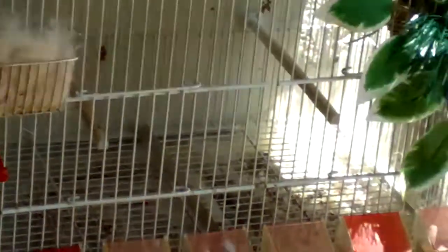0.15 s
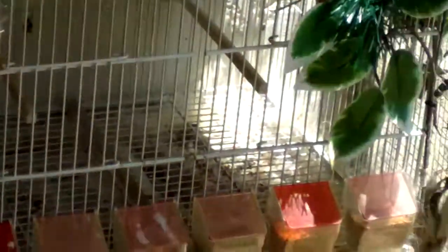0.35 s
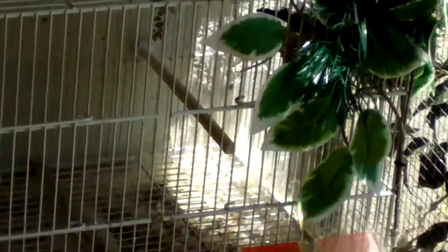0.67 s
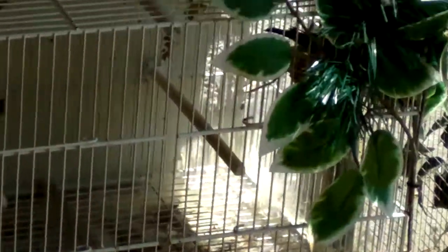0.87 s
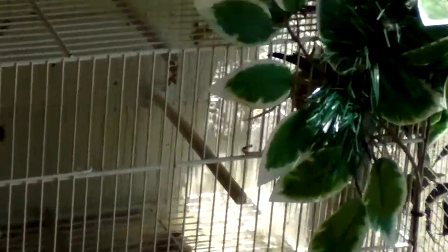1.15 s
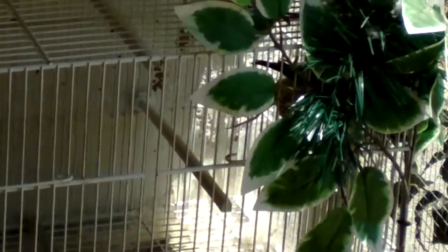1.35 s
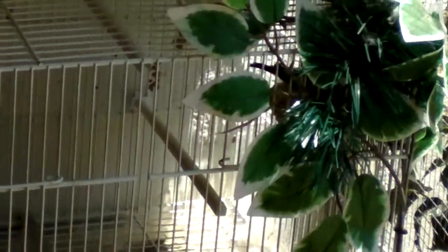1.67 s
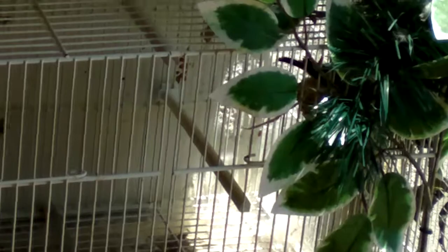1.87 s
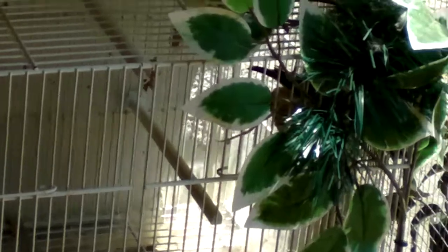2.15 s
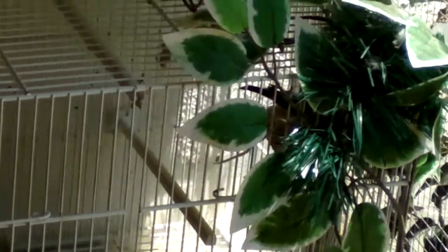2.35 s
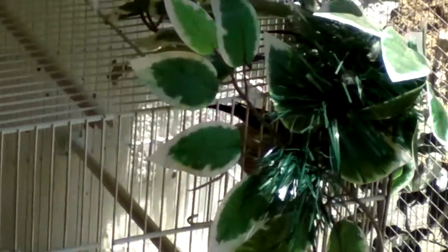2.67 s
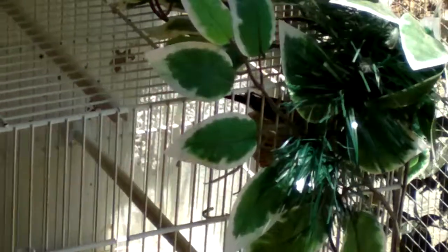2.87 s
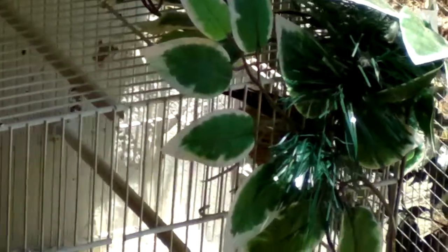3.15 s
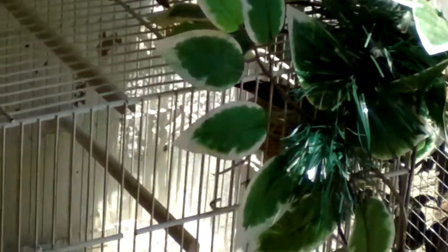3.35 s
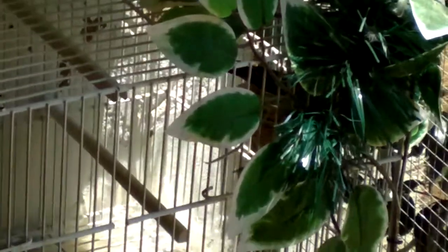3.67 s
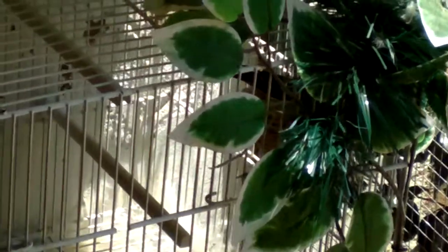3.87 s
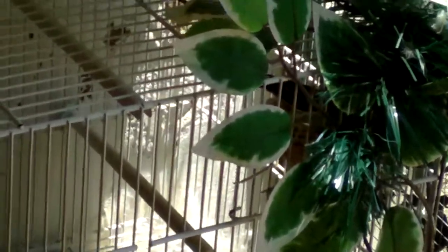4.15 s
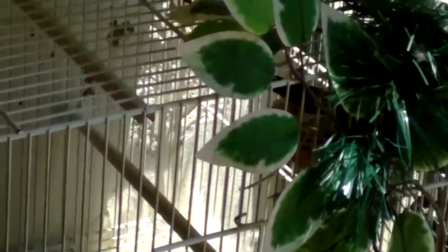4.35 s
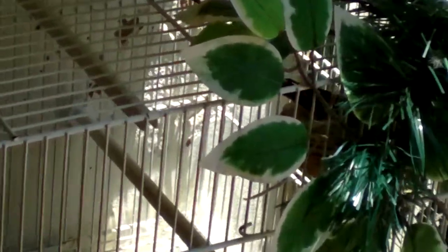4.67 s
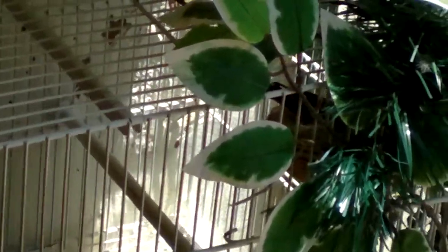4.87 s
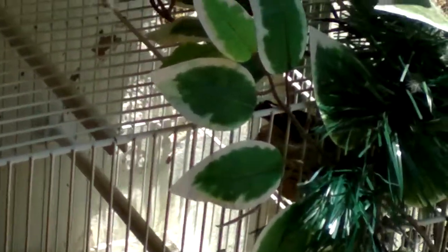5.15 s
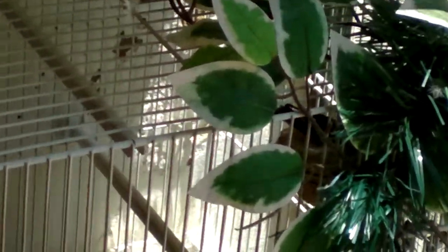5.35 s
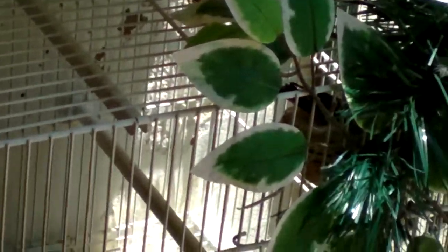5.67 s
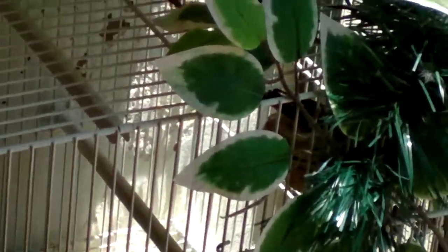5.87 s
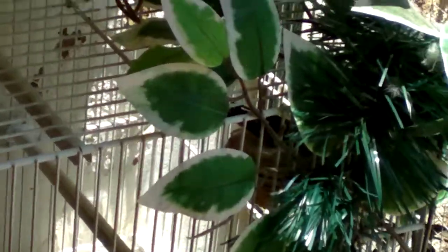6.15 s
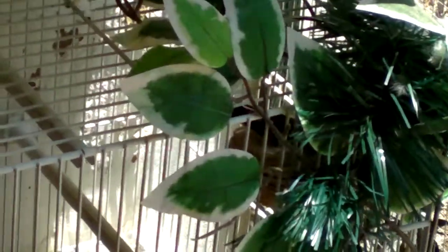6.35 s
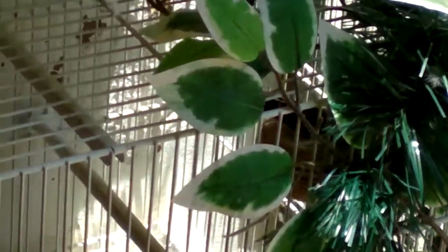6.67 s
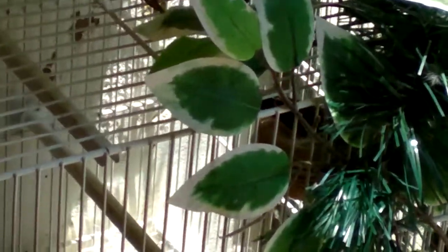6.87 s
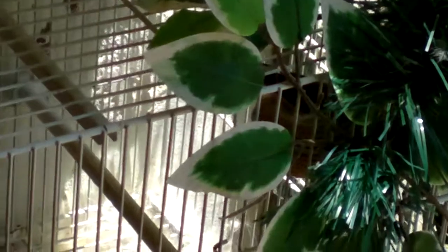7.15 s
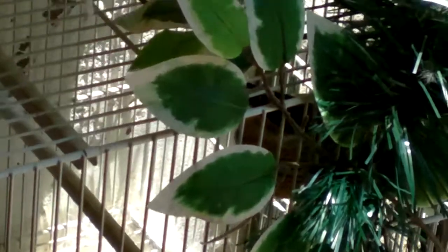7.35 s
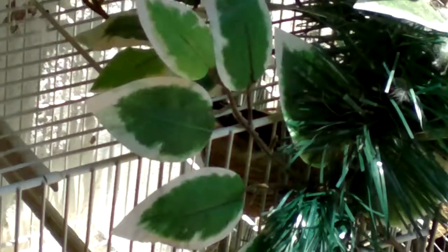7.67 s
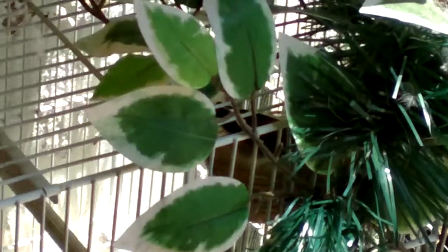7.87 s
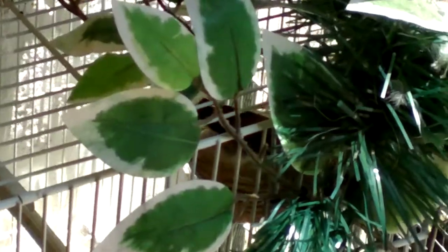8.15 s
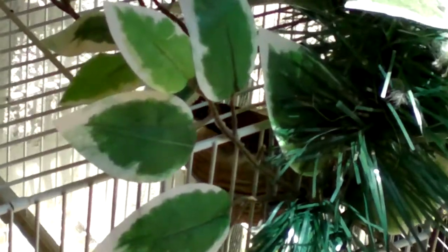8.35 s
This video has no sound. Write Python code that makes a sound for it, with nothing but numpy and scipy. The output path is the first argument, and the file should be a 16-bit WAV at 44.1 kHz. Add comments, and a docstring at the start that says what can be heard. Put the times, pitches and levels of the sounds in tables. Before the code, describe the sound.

In a small, slightly echoing room with a faint steady hush, caged finches exchange high chirps with short pauses. A pair of light knocks comes right by the microphone, and a bird flutters, its feathers grazing the wires. Quick sweeping notes and pips follow in scattered bursts, building to a rising whistle with a buzzy undertone and a loud flurry of chirps. A muffled close knock and two quiet chips finish.

```python
"""Goldfinches in wire cages, heard from one microphone in a small, bright room. Rising contact chips open
from the far perches, and two small knocks sound close to the microphone. Wings flutter and brush the
wires, most around 2 s, while nearer birds chip in. From 4 s the song comes in bursts, often on both
sides of the syrinx at once. Just after 7 s a long whistle rises and swells over a nasal wheeze;
a few loud notes, one more close knock and two soft chips end the scene."""
import sys
import numpy as np
from scipy import signal
from scipy.fft import rfft, irfft, next_fast_len
from scipy.io import wavfile
from scipy.ndimage import map_coordinates

SR = 44100
rng = np.random.default_rng(int(sys.argv[2]) if len(sys.argv) > 2 else 0)


def transcribe(u):
    """Save the signal u as a 16-bit wav file named by the first command-line argument.

    u: samples, shape (n,) or (channels, n), limited to [-1, 1]; the rate is SR.
    q: integer samples, one column per channel.
    """
    v = np.clip(np.atleast_2d(u).T, -1, 1)
    q = np.round(v * 32767).astype(np.int16)
    wavfile.write(sys.argv[1], SR, q)


N = 375732

NEAR_DB, MID_DB, FAR_DB = 4.5, -5, -19.5  # direct sound at the microphone from three perches
# runs of rising contact calls: start_s, chip_count, top_pitch_hz, level_db, perch_db
CHIP_RUNS = [(-.02, 1, 4560, -26, FAR_DB), (.326, 1, 4493, -33, FAR_DB), (0.44, 1, 4820, -28.5, FAR_DB),
             (1.237, 1, 3507, -30, MID_DB), (1.441, 1, 3595, -26.5, MID_DB), (1.487, 1, 4930, -29, FAR_DB),
             (2.177, 4, 4930, -22.5, FAR_DB), (3.106, 1, 3576, -27.5, MID_DB),
             (3.424, 1, 3760, -48, NEAR_DB), (3.634, 3, 4850, -24.5, FAR_DB),
             (4.533, 1, 3825, -45, NEAR_DB), (4.908, 1, 4103, -42.5, NEAR_DB),
             (5.316, 1, 4168, -24.5, MID_DB), (6.142, 1, 4110, -27.5, FAR_DB),
             (6.229, 1, 4086, -24.5, FAR_DB), (7.009, 1, 3760, -35.5, MID_DB),
             (7.373, 1, 3605, -22.5, MID_DB), (7.706, 1, 3963, -18.5, FAR_DB),
             (8.322, 1, 3900, -49, NEAR_DB), (8.464, 1, 3890, -39, MID_DB)]
# notes that fall onto a held pitch: start_s, length_s, held_pitch_hz, level_db
FALLING_NOTES = [(0.094, 0.066, 2886, -41.5), (.477, 0.028, 2760, -36), (0.752, 0.083, 2667, -58.5),
                 (0.887, 0.18, 2668, -53.5), (3.224, 0.041, 2800, -42.5), (5.654, 0.053, 3526, -24),
                 (7.153, 0.043, 2985, -39.5), (7.834, .06, 2854, -23.5)]
# notes with a far steeper fall: start_s, length_s, held_pitch_hz, level_db
WHIP_NOTES = [(7.277, 0.031, 3943, -20), (7.925, 0.024, 4190, -23)]
# notes that climb and level off: start_s, length_s, start_pitch_hz, top_pitch_hz, level_db
CLIMBING_NOTES = [(4.208, 0.044, 3087, 4630, -22), (5.415, .045, 2540, 3352, -30),
                  (5.476, 0.04, 3760, 4430, -19), (7.097, 0.034, 3190, 3624, -32.5),
                  (7.303, 0.034, 2406, 2725, -35.5), (7.468, 0.032, 4200, 5090, -23)]
# steep two-voiced sweeps: start_s, length_s, start_pitch_hz, end_pitch_hz, level_db
SWEEP_NOTES = [(1.326, 0.039, 4184, 5596, -31.5), (2.991, 0.022, 4434, 5610, -27.5),
               (4.109, .034, 3560, 8050, -31), (7.75, 0.024, 3200, 5940, -17.5)]
# high two-voiced pips: start_s, upper_pitch_hz, level_db, lower_voice_relative_db
PIP_NOTES = [(2.845, 6770, -26.5, -2.5), (4.845, 7060, -41, 5.5), (5.591, 5860, -23.5, -20),
             (7.155, 6820, -24, -3.5)]
# course of the long whistle: time_s, pitch_hz
WHISTLE_PITCH = [(7.18, 2122), (7.45, 3300), (7.511, 3353), (7.553, 3724), (7.581, 3734)]
# nasal wheeze under the whistle: start_s, length_s, start_pitch_hz, level_db
WHEEZE_NOTE = (7.346, 0.21, 1508.5, -25.5)
# the throat during the wheeze: time_s, resonance_hz
THROAT_RESONANCE = [(7.402, 8120), (7.412, 4550), (7.52, 4700)]
# soft low notes between the calls: start_s, held_pitch_hz, level_db
HUSKY_NOTES = [(3.481, 1494, -57.5), (4.33, 1976, -64.5), (4.57, 1410, -59), (5.44, 1106, -49),
               (5.664, 1137, -48.5), (5.92, 1950, -60.5)]
# strength of a syrinx overtone by where it falls: frequency_hz, gain_db
OVERTONE_GAINS = [(6500, -36.5), (8800, -35.5), (12300, -23.5), (16000, -34)]
# bouts of wingbeats: first_peak_s, beat_count, level_db, fade_per_beat_db (negative grows)
WING_BOUTS = [(.01, 2, -57.5, -6.5), (0.226, 6, -56, 0.3), (0.954, 2, -61, -6.5), (1.58, 1, -47.5, 0),
              (1.631, 7, -37, 2.13), (2.543, 2, -43, 14), (5.464, 1, -57.5, 0), (5.69, 2, -48, 7),
              (6.302, 2, -57.5, -8.5), (7.33, 2, -53, 1), (7.815, 1, -47.5, 0)]
# wing tips brushing the wires: peak_s, level_db
WIRE_BRUSHES = [(0.945, -54.5), (1.63, -55.5), (1.725, -41.5), (1.87, -45.5), (2.08, -51.5), (5.689, -60),
                (6.285, -46.5), (7.497, -58), (7.9, -53)]
# air pushed by a wing: frequency_hz, level_db
WHOOSH_SPECTRUM = [(150, -23), (500, -18.5), (950, -8.5), (1600, 2), (2100, 2.5), (2900, -16.5),
                   (9000, -41.5)]
# feathers rubbing: frequency_hz, level_db
FEATHER_SPECTRUM = [(400, -23), (1600, -1), (3000, 10), (5000, -4), (7500, 3.5), (12000, -3.5),
                    (15500, -17)]
# knocks by the microphone: start_s, level_db, thump_relative_db, contact_cutoff_hz
CLOSE_KNOCKS = [(0.733, -35, -25, 5970), (0.848, -22.5, -12.5, 3450), (8.139, -25.5, -40, 654)]
# ring of a knock: frequency_hz, level_db, t60_s
KNOCK_RING = [(323, -17, 0.017), (610, -10, 0.016), (1270, -6, 0.013), (2150, 4.5, 0.0059)]
# decay of the room's tail: frequency_hz, t60_s
ROOM_DECAY = [(300, 0.7), (2000, 0.4), (4500, 0.39), (7000, 0.26), (14000, .25)]
# the quiet room: frequency_hz, level_db
ROOM_TONE_SPECTRUM = [(15, -31), (25, 3), (604, -7.5), (857, -10), (1010, -11.5), (1640, -12.5),
                      (3990, -20.5), (9210, -19), (15800, -33)]


def chips(length=.042, gap_s=.108, start=.56, crest=.72, lower_db=-9, far_cutoff_hz=6200):
    """Near and far chips sweep up and bend over at a crest; the syrinx's other side rasps beneath."""
    out = np.zeros(N)
    _, u = clock(length)
    for s, count, top_hz, db, perch_db in CHIP_RUNS:
        upper_hz = top_hz * (1 - (1 - start) * (1 - u / crest) ** 2)
        lower_hz = top_hz * (.58 + .3 * u)
        for k in range(count):
            upper = syrinx(upper_hz, waver=.025, flutter_db=4.5, rolloff_db=-7.5)
            lower = syrinx(lower_hz, waver=.09, rolloff_db=-13)
            call = upper * swell(u, peak=.47, fullness=2.4)
            call += amp(lower_db) * lower * swell(u, peak=.53, fullness=.89)
            if perch_db == FAR_DB:  # far birds sound duller
                call = signal.lfilter(*signal.butter(4, far_cutoff_hz, fs=SR), call)
            add(out, s + k * gap_s, in_room(amp(db) * call, perch_db, walls_db=-1.5, tail_db=-14.5))
    return out


def song(climb_hz_per_s=33000, level_off_hz=121, pip_s=.032):
    """Song syllables from the cages: falling, climbing and two-voiced notes of the syrinx."""
    out = np.zeros(N)
    for s, length, hz, db in FALLING_NOTES:
        note = falling(length, hz, fall=.22, settle_s=.031, waver=.018)
        add(out, s, in_room(amp(db) * note, walls_db=-2.5, tail_db=-17))
    for s, length, hz, db in WHIP_NOTES:
        note = falling(length, hz, fall=1, settle_s=.012, waver=.02, peak=.54, fullness=1.1)
        add(out, s, in_room(amp(db) * note, walls_db=-.8, tail_db=-12.5))
    for s, length, start_hz, top_hz, db in CLIMBING_NOTES:
        t, u = clock(length)
        below_top_hz = top_hz - start_hz - climb_hz_per_s * t
        hz = top_hz - level_off_hz * np.logaddexp(0, below_top_hz / level_off_hz)
        note = syrinx(hz, waver=.027) * swell(u, peak=.73, fullness=.8)
        add(out, s, in_room(amp(db) * note, walls_db=.5, tail_db=-12))
    for s, length, start_hz, end_hz, db in SWEEP_NOTES:
        note = two_voices(np.geomspace(start_hz, end_hz, int(length * SR)), lower_db=-3.5, waver=.03)
        add(out, s, in_room(amp(db) * note, walls_db=.2, tail_db=-10))
    for s, hz, db, lower_db in PIP_NOTES:
        note = two_voices(np.full(int(pip_s * SR), hz), lower_db, waver=.021, peak=.62, fullness=2.6)
        add(out, s, in_room(amp(db) * note, walls_db=-1.5, tail_db=-12))
    return out


def whistle(thin_db=-46, climax_db=-12.5, attack_s=.05, crescendo_s=.075, hold_s=.02, release_s=.02):
    """One side of the syrinx holds a thin, rising tone that swells just before it ends."""
    out = np.zeros(N)
    start, end = WHISTLE_PITCH[0][0], WHISTLE_PITCH[-1][0]
    t = np.arange(start, end, 1 / SR)
    hz = np.interp(t, *np.transpose(WHISTLE_PITCH))
    before_end = np.cumsum([0, release_s, hold_s, crescendo_s])
    db = np.interp(end - t, before_end, [thin_db, climax_db, climax_db, thin_db])
    onset = np.minimum(1, (t - start) / attack_s)
    tone = syrinx(hz, waver=.006, flutter_db=.6, rolloff_db=-15)
    add(out, start, in_room(amp(db) * onset * tone, walls_db=-4, tail_db=-17.5))
    return out


def wheeze(rise_hz_per_s=520, attack_s=.05, release_s=.083, width_hz=380, rasp_db=3, buzz_db=-32):
    """Under the whistle, the other side of the syrinx buzzes with a stack of overtones."""
    out = np.zeros(N)
    s, length, start_hz, level_db = WHEEZE_NOTE
    t, _ = clock(length)
    hz = start_hz + rise_hz_per_s * t
    ramp = np.minimum(t / attack_s, (length - t) / release_s)
    db = level_db - 24 * (1 - np.minimum(1, ramp))
    throat_hz = np.interp(s + t, *np.transpose(THROAT_RESONANCE))
    phase = 2 * np.pi * np.cumsum(hz * (1 + .0044 * wobble(500, len(t)))) / SR
    stack = np.zeros(len(t))
    for k in range(2, 11):
        # the throat picks out whichever overtone lies nearest to its resonance
        throat = 1 / (1 + ((k * hz - throat_hz) / width_hz) ** 2) + amp(buzz_db)
        stack += throat * np.sin(k * phase) * amp(rasp_db * wobble(200, len(t)))
    add(out, s, in_room(np.sqrt(2) * amp(db) * stack, walls_db=-4, tail_db=-11.5))
    return out


def low_notes(length=.034):
    """Quiet, husky falling notes an octave or two under the calls."""
    out = np.zeros(N)
    for s, hz, db in HUSKY_NOTES:
        note = falling(length, hz, fall=.2, settle_s=.03, waver=.1)
        add(out, s, in_room(amp(db) * note, walls_db=1.5, tail_db=-18))
    return out


def syrinx(hz, waver, flutter_db=3, rolloff_db=-9, husk=.018, fray=.14):
    """One side of the syrinx: a slightly unsteady, husky tone with weak, frayed overtones."""
    hz = hz * (1 + waver * wobble(700, len(hz)))
    phase = 2 * np.pi * np.cumsum(hz) / SR
    overtones = np.zeros(len(hz))
    for k in (2, 3, 4):
        gain = amp(along(OVERTONE_GAINS, k * hz) + rolloff_db * (k - 2))
        overtones += gain * np.sin(k * phase) * (k * hz < SR / 2)
    # turbulent air shakes the tone quickly, the more so the more it flutters
    turbulence = flutter_db * wobble(3500, len(hz))
    tone = np.sin(phase) * (1 + husk * turbulence)
    tone += overtones * (1 + fray * turbulence) / np.hypot(1, fray * flutter_db)
    return np.sqrt(2) * tone * amp(flutter_db * wobble(250, len(hz)))


def falling(length, held_hz, fall, settle_s, waver, peak=.75, fullness=.56):
    """A note that starts above its held pitch by the share fall and eases down onto it."""
    t, u = clock(length)
    hz = held_hz * (1 + fall * np.maximum(1 - t / settle_s, 0) ** 2)
    return syrinx(hz, waver) * swell(u, peak, fullness)


def two_voices(hz, lower_db, waver, peak=.5, fullness=1.1, lower_ratio=.875):
    """Both sides of the syrinx at once, beating against each other."""
    note = syrinx(hz, waver) + amp(lower_db) * syrinx(lower_ratio * hz, waver)
    return note * swell(np.linspace(0, 1, len(hz)), peak, fullness)


def wings(rise_s=.04, fall_s=.046, beat_s=.096, brush_rise_s=.022, brush_fall_s=.03, grain_db=3):
    """Each stroke pushes a whoosh of air; feathers brush with a fine grain, loudest on the wires."""
    air = np.zeros(N)
    stroke_s, touch_s = rise_s + fall_s, brush_rise_s + brush_fall_s
    stroke = swell(clock(stroke_s)[1], peak=rise_s / stroke_s, fullness=.57)
    touch = swell(clock(touch_s)[1], peak=brush_rise_s / touch_s, fullness=.9)
    for s, count, db, fade_db in WING_BOUTS:
        for k in range(count):
            add(air, s + k * beat_s - rise_s, amp(db - k * fade_db) * stroke)
    brush = amp(-12) * air  # feathers rub softly on every stroke
    for s, db in WIRE_BRUSHES:
        add(brush, s - brush_rise_s, amp(db) * touch)
        add(air, s - brush_rise_s, amp(db + 2) * touch)
    whoosh = air * noise(WHOOSH_SPECTRUM)
    feathers = brush * amp(grain_db * wobble(500, N)) * noise(FEATHER_SPECTRUM)
    return in_room(whoosh + feathers, walls_db=-7, tail_db=-7.5)[:N]


def knocks(thump_hz=42, thump_t60=.15, tick_db=-4, tick_t60=.0064):
    """Dry knocks by the microphone: a tick, a brief ring and a low thump; soft contacts are duller."""
    out, t = np.zeros(N), np.arange(SR // 6) / SR
    for s, db, thump_db, cutoff_hz in CLOSE_KNOCKS:
        ring = sum(amp(level - 60 * t / t60) * np.sin(2 * np.pi * hz * t)
                   for hz, level, t60 in KNOCK_RING)
        tick = amp(tick_db - 60 * t / tick_t60) * rng.standard_normal(len(t))
        thump = amp(thump_db - 60 * t / thump_t60) * np.sin(2 * np.pi * thump_hz * t)
        contact = signal.butter(2, cutoff_hz, fs=SR)
        add(out, s, amp(db) * signal.lfilter(*contact, ring + tick + thump))
    return out


def shuffling(level_db=-77, swing_db=4):
    """Birds shift about faintly in the other cages."""
    return amp(level_db + swing_db * np.minimum(wobble(7, N), 2)) * noise(WHOOSH_SPECTRUM)


def in_room(x, direct_db=0, *, walls_db, tail_db, walls_t60=.11, build_s=.039):
    """Perch to microphone: the direct path, quick echoes off the cage walls, then the room's tail."""
    hz, t, spectrum = signal.stft(rng.standard_normal(SR), SR, nperseg=256)
    decay = amp(-60 * t / along(ROOM_DECAY, hz)[:, None])
    _, tail = signal.istft(spectrum * decay, SR, nperseg=256)
    t = np.arange(len(tail)) / SR
    tail *= 1 - np.exp(-t / build_s)
    walls = rng.standard_normal(len(t)) ** 3 * amp(-60 * t / walls_t60) * (t > .002)
    # with distance the wall echoes lose half as many decibels as the direct sound, the tail none
    response = amp(tail_db) * tail / np.linalg.norm(tail)
    response += amp(walls_db + direct_db / 2) * walls / np.linalg.norm(walls)
    response[0] += amp(direct_db)
    return signal.fftconvolve(x, response)


def room_tone(level_db=-68):
    """The steady hush of the room behind the birds."""
    return amp(level_db) * noise(ROOM_TONE_SPECTRUM)


def amp(db):
    """Decibels to gain."""
    return 10 ** (np.asarray(db) / 20)


def along(points, hz):
    """Read (frequency_hz, value) points on a log axis."""
    frequencies, values = np.transpose(points)
    return np.interp(np.log(hz + 1), np.log(frequencies + 1), values)


def clock(length):
    """Seconds since the start of a note, and its progress u from 0 to 1."""
    t = np.arange(int(length * SR)) / SR
    return t, t / length


def swell(u, peak, fullness):
    """An arch over u = 0..1 with its top at peak; a larger fullness exponent narrows it."""
    return np.abs(np.sin(np.pi * np.interp(u, [0, peak, 1], [0, .5, 1]))) ** fullness


def wobble(rate, size):
    """A smooth random curve, rate knots a second."""
    knots = rng.standard_normal(int(size * rate / SR) + 4)
    return map_coordinates(knots, [np.arange(size) * rate / SR])


def filtered(x, gain):
    """Apply a gain that depends on frequency."""
    size = next_fast_len(N + SR // 4)
    return irfft(rfft(x, size) * gain(np.fft.rfftfreq(size, 1 / SR)), size)[:N]


def noise(spectrum):
    """Coloured noise of rms 1."""
    x = filtered(rng.standard_normal(N), lambda hz: amp(along(spectrum, hz)))
    return x / np.sqrt(np.mean(x ** 2))


def add(track, s, x):
    """Mix x into the track at time s."""
    i = round(s * SR)
    x = x[max(-i, 0):max(N - i, 0)]
    track[max(i, 0):][:len(x)] += x


def scene():
    """Birds around the room and knocks close by, over the room tone, in mono."""
    birds = chips() + song() + low_notes() + whistle() + wheeze() + wings() + shuffling()
    return (birds + knocks() + room_tone())[None]


def record(dry, top_hz=15850):
    """The camera's microphone channel passes nothing above its band limit."""
    return np.array([filtered(channel, lambda hz: hz < top_hz) for channel in dry])


dry = scene()
out = record(dry)
transcribe(out)
```